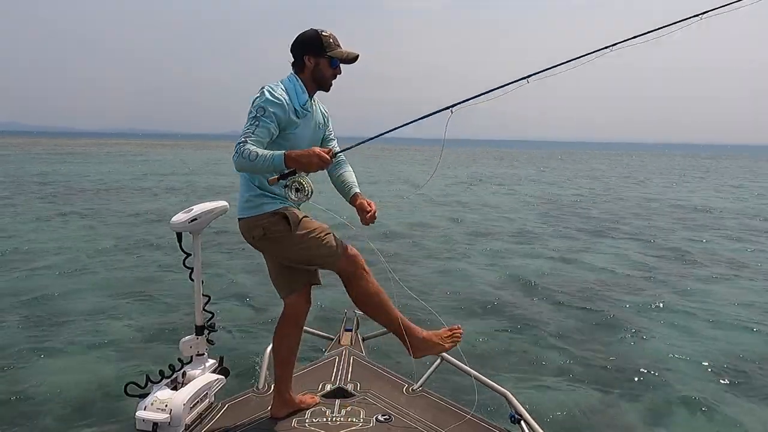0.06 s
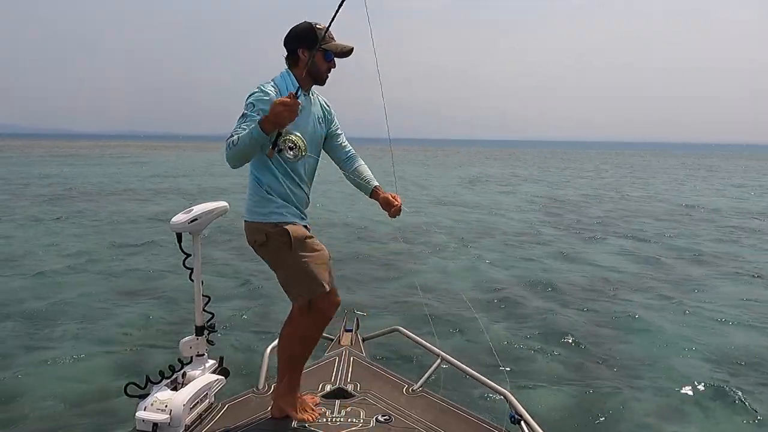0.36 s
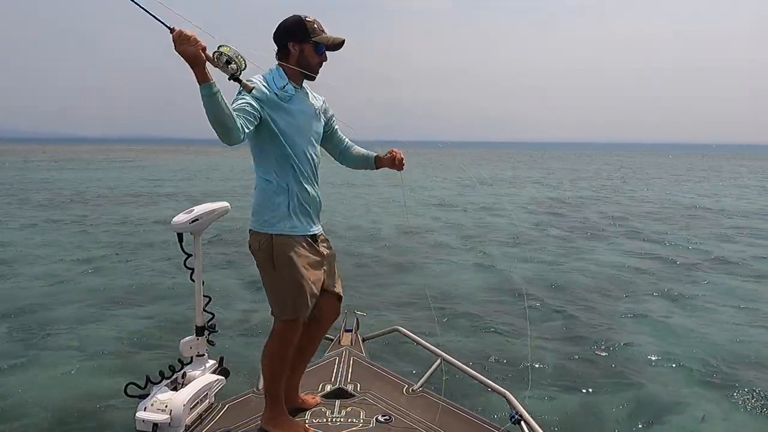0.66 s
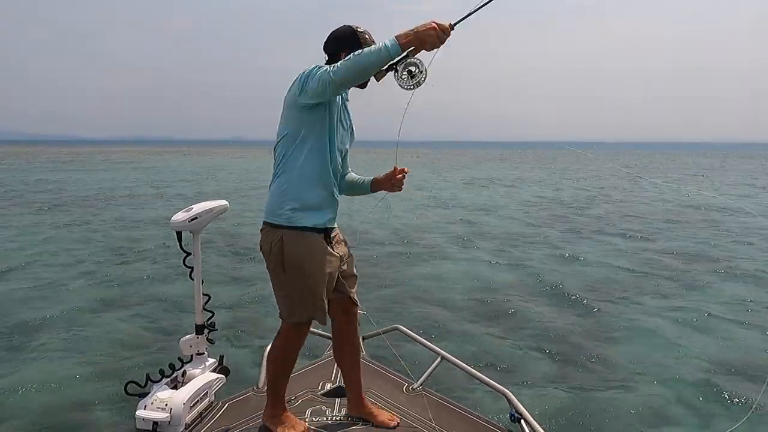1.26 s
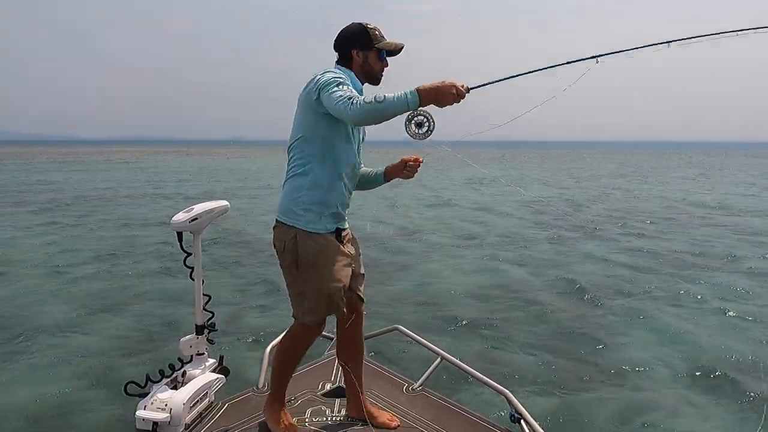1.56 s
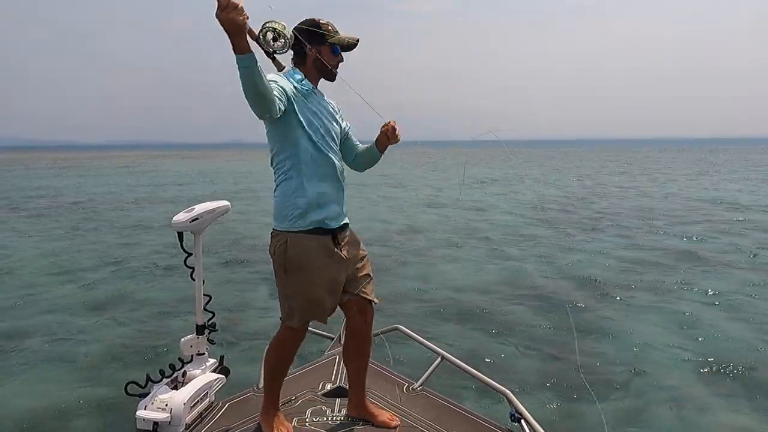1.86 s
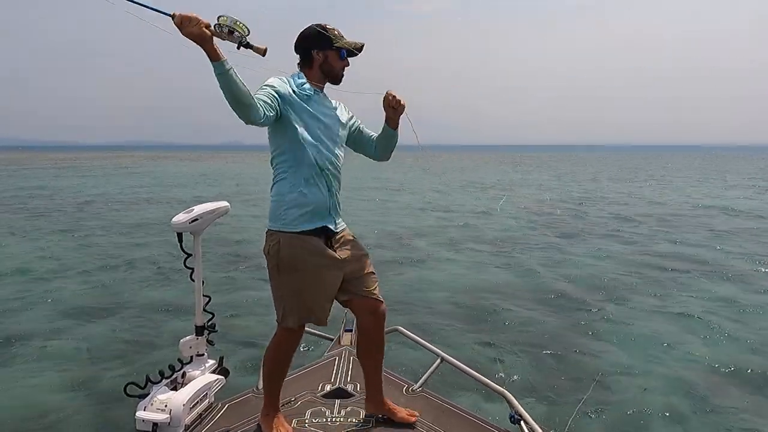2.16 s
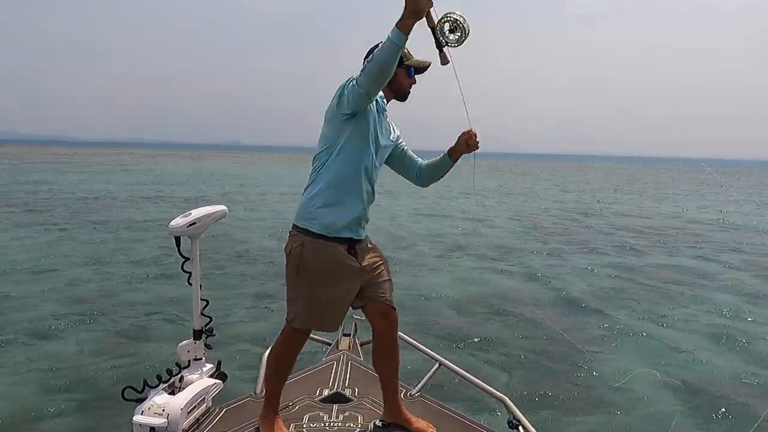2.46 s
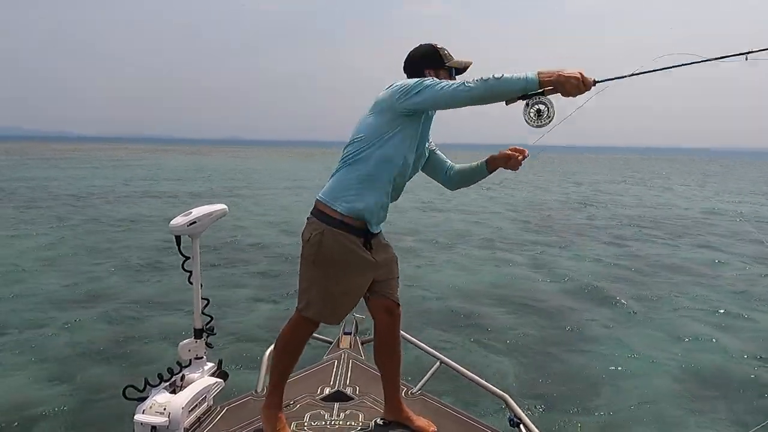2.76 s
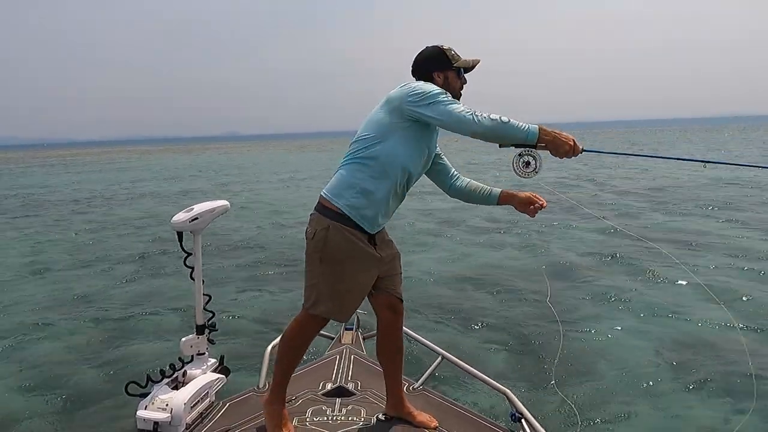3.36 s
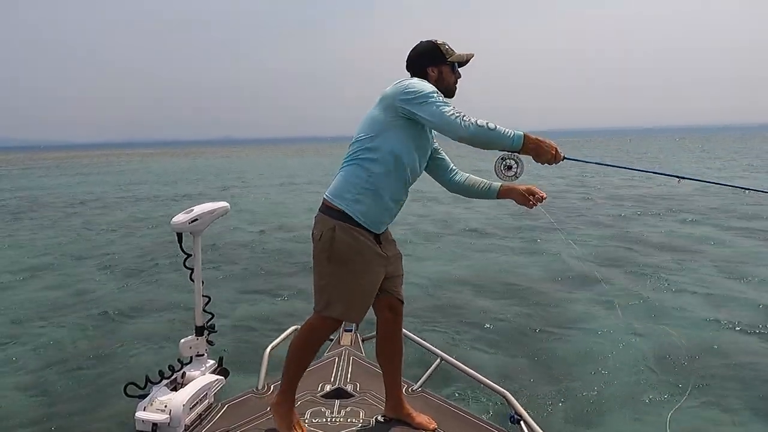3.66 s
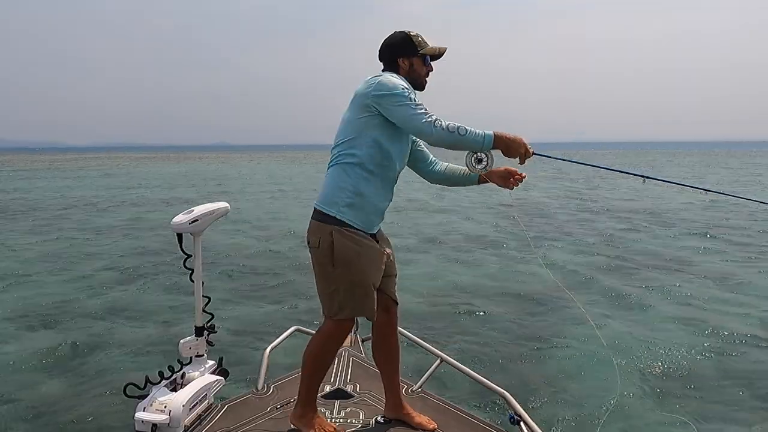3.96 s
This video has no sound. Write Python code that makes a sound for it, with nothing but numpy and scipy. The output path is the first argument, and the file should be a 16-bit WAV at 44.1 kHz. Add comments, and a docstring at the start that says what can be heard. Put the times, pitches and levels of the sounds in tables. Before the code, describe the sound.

A fly rod swishes and its line whistles at about 0.7 seconds, over steady wind rumble on the microphone and a faint sea wash. The line hisses and ticks through the rings around 1.3 seconds, then a hard gust thumps at 1.6. A second swish comes at 2 seconds, with soft line hiss near 2.8. Dull wind knocks crowd the last half second, with one dry tick among them.

```python
"""Fly casting from the bow of a boat on open water. From the start, wind rumbles on the microphone and
hits it in short low knocks, over a faint wash of sea. At 0.7 s comes a back cast: the rod swishes and the
line whistles after it. On the forward cast, at 1.3 s, the line hisses and ticks through the rod rings,
and a hard buffet follows. A second back cast swishes at 2 s, the line hisses forward again near 2.8 s,
and the wind knocks crowd together in the last half second, with one short, dry tick among them."""
import sys
import numpy as np
from scipy import signal
from scipy.fft import rfft, irfft, next_fast_len
from scipy.io import wavfile
from scipy.ndimage import uniform_filter1d, minimum_filter1d, map_coordinates

SR = 44100
rng = np.random.default_rng(int(sys.argv[2]) if len(sys.argv) > 2 else 0)


def wrap_up_sound(samples):
    """Save the sound to the file named by the first command line argument, as 16-bit audio."""
    columns = np.atleast_2d(samples).T
    # keep every value between -1 and 1, then stretch to whole-number steps
    tamed = np.clip(columns, -1, 1)
    steps = np.round(tamed * 32767).astype(np.int16)
    wavfile.write(sys.argv[1], SR, steps)


N = 176400  # 4 s


def amp(db):
    """Decibels to gain."""
    return 10 ** (np.asarray(db) / 20)


def unit(x):
    """Scale to rms 1."""
    return x / np.sqrt(np.mean(x ** 2) + 1e-20)


def eq(points):
    """An EQ curve: gain as a function of frequency, through dB points on a log axis."""
    freqs, db = np.transpose(points)
    return lambda freq: amp(np.interp(np.log(freq + 1e-6), np.log(freqs), db))


def faders(rows):
    """One value per sample for each column after the time."""
    times, *columns = np.transpose(rows)
    return [np.interp(np.arange(N) / SR, times, column) for column in columns]


def wobble(rate_hz):
    """A smooth random curve with rate_hz knots a second."""
    return map_coordinates(rng.standard_normal(4096), [np.arange(N) * rate_hz / SR], mode="wrap")


def filtered(x, response):
    """Shape x by a gain that depends on frequency."""
    size = next_fast_len(N + 8192)
    return irfft(rfft(x, size) * response(np.fft.rfftfreq(size, 1 / SR)), size)[:N]


def noise(spectrum):
    """Coloured noise of rms 1."""
    return unit(filtered(rng.standard_normal(N), eq(spectrum)))


def steadied(x, samples):
    """Even out the chance swells of a noise."""
    return x / np.sqrt(np.abs(uniform_filter1d(x ** 2, samples)) + 1e-9)


def swell(at, rise, fall, shape):
    """An envelope that peaks at a given time: shape 1 is a spike, 2 a bell, 3 flatter on top."""
    t = np.arange(N) / SR - at
    return np.exp(-.5 * np.abs(t / np.where(t < 0, rise, fall)) ** shape)


def gliding_noise(at, pitch_hz, glide, colour, patch_db):
    """Noise whose colour rides on a gliding pitch, with brief chance tones patch_db deep."""
    hz, t, spectra = signal.stft(rng.standard_normal(N), SR, nperseg=512)
    pitch = pitch_hz * 2 ** (glide * np.clip(t - at, -.12, .12))
    patches = uniform_filter1d(rng.standard_normal(spectra.shape), size=3, axis=0)
    patches = unit(uniform_filter1d(patches, size=5, axis=1))
    gain = colour((hz[:, None] + 1) / pitch) * amp(patch_db * patches)
    gain /= np.sqrt(np.mean(gain ** 2, axis=0) + 1e-12)
    return signal.istft(spectra * gain, SR, nperseg=512)[1][:N]


# Wind fader rides, ahead of trim and cap (time [s], rumble level [dB], flutter level [dB])
WIND_RIDES = [(0.0, -16.5, -29), (0.24, -29, -58), (0.29, -20, -35), (0.32, -21, -43.5), (0.48, -20, -29.5),
              (0.65, -21, -38.5), (1.08, -19.5, -29.5), (1.38, -19.5, -32.5), (1.5, -18, -22.5),
              (1.58, -13, -47), (1.6, -32, -33), (1.73, -24.5, -36.5), (1.88, -19.5, -30),
              (1.97, -20.5, -29.5), (2.07, -21, -35.5), (2.13, -18.5, -28.5), (2.24, -20, -38),
              (2.3, -16, -28.5), (2.32, -23, -35.5), (2.51, -18, -16), (2.53, -23.5, -36.5),
              (2.62, -17.5, -28), (2.73, -20.5, -38.5), (2.84, -18.5, -26), (2.96, -22, -36.5),
              (2.99, -17, -24), (3.12, -23.5, -36.5), (3.27, -19, -28.5), (3.43, -23, -37.5),
              (3.48, -19, -35), (3.6, -20.5, -28), (3.62, -17.5, -26.5), (3.98, -20, -37),
              (4.0, -20.5, -55)]
# Lulls between buffets; a negative depth is a lift (time [s], depth [dB], half length [s])
WIND_LULLS = [(0.0,0,0.029),(0.522,1,0.025),(0.613,6.5,.018),(0.875,1,0.032),(1.286,8,0.0072),(1.364,8.5,0.02),(1.654,12,0.0058),(1.719,4,0.013),(2.054,11.5,0.013),(2.22,5.5,0.01),(2.712,2.5,.012),(3.19,1,0.012),(3.41,-4.5,0.011),(3.932,0,0.0086)]
# Sub-heavy body of the wind (frequency [Hz], level [dB])
RUMBLE_EQ = [(15,-3),(28,0),(58,0.5),(85,-3),(120,-2.5),(160,-10),(240,-15),(400,-27),(800,-66),(2000,-120)]
# Its low-mid flutter (frequency [Hz], level [dB])
FLUTTER_EQ = [(60,-40.5),(170,-3),(300,4.5),(420,-4.5),(600,-12),(850,-23.5),(1300,-37.5),(2500,-83),(6000,-88)]


def wind(rumble_trim_db=1.54, flutter_trim_db=-0.5, flutter_cap_db=-28):
    """Wind on the microphone: a deep rumble that drops between buffets, under a quick, lumpy flutter."""
    rumble_db, flutter_db = faders(WIND_RIDES)
    lull_db = sum(db * swell(at, half, half, shape=2.6) for at, db, half in WIND_LULLS)
    rumble = amp(rumble_db - lull_db + rumble_trim_db) * steadied(noise(RUMBLE_EQ), samples=1400)
    flutter = unit(steadied(noise(FLUTTER_EQ), samples=1000) * amp(2.5 * wobble(110)))
    return rumble + amp(np.minimum(flutter_db, flutter_cap_db) + flutter_trim_db) * flutter


# Fader ride of the sea wash (time [s], level [dB])
WASH_RIDE = [(0,-54.5),(.25,-52),(.5,-49.5),(.9,-50.5),(1.1,-46),(1.35,-48),(1.6,-53.5),(1.9,-49),(2.25,-55.5),(2.7,-55),(2.95,-58),(3.05,-48),(3.2,-58),(3.32,-53.5),(3.6,-55.5),(4,-53.5)]
# Soft midrange of the wash (frequency [Hz], level [dB])
WASH_EQ = [(200,-6.5),(700,12.5),(1300,6),(2500,0.5),(4000,-6.5),(5500,-14),(7500,-23.5),(9800,-35),(11000,-43),(14000,-52.5)]
# Fader ride of the water's fizz (time [s], level [dB])
FIZZ_RIDE = [(0,-73),(.15,-69.5),(.25,-65),(.6,-66.5),(1,-67.5),(1.19,-82),(1.3,-58),(1.58,-69.5),(1.66,-67.5),(2.2,-71.5),(2.58,-71),(3,-70.5),(3.44,-65),(3.6,-66),(3.8,-77),(4,-68.5)]
# Thin, bright tone of the fizz (frequency [Hz], level [dB])
FIZZ_EQ = [(2000,-15.5),(4000,4),(5500,-1),(7500,-8),(9800,-15.5),(11000,-23.5),(13000,-37)]


def sea():
    """Small waves lay down a faint bed of wash, with a high fizz on top."""
    wash = amp(faders(WASH_RIDE)[0] + 2.06 * wobble(35.06)) * noise(WASH_EQ)
    fizz = amp(faders(FIZZ_RIDE)[0] + 1.3 * wobble(45)) * noise(FIZZ_EQ)
    return wash + fizz


# Wind hits on the microphone (time [s], level [dB], half length [s], low-pass corner [Hz])
KNOCK_CUES = [(0.049,-26.5,0.0037,490),(0.079,-25.5,0.0037,397),(0.391,-25,0.0028,340),(0.426,-32,.005,560),(0.47,-24.5,0.0055,547),(0.565,-26,0.008,440),(0.782,-27,0.01,336),(1.09,-26,0.0033,560),(1.124,-29,0.0056,540),
              (1.517,-14.5,0.0018,616),(1.528,-16.5,0.0026,520),(1.55,-16,0.003,476),(1.553,-16,0.0072,192),(1.561,-20,0.0015,720),(1.5678,-18,0.0015,1300),(1.568,-38,0.00077,2700),(1.571,-18,0.0036,725),(1.5776,-11.5,0.0025,565),(1.817,-27.5,0.0062,470),
              (2.298,-17,0.0018,516),(2.343,-26.5,0.0045,644),(2.486,-21.5,0.0019,513),(2.501,-23,0.0039,473),(2.666,-23.5,0.0038,610),(2.682,-25,0.0056,470),(2.841,-23,0.0029,425),
              (2.99,-16,0.0037,556),(3.012,-21.5,0.0067,390),(3.052,-26,0.0048,530),(3.293,-25,0.0093,387),(3.477,-16.5,0.0047,480),(3.494,-23.5,0.0019,565),
              (3.527,-19,0.0045,570),(3.546,-21.5,0.0064,430),(3.6182,-22.5,0.0021,586),(3.627,-21.5,0.0018,520),(3.661,-19.5,0.0053,380),(3.664,-15.5,0.0032,684),(3.698,-23,0.0038,900),
              (3.739,-19.5,0.0075,570),(3.737,-27.5,0.0012,1900),(3.7413,-30,0.00068,2270),(3.788,-25,0.0059,580),(3.8032,-17,0.00087,810),(3.812,-22,0.0029,710),(3.835,-20.5,0.0031,580),(3.878,-23,0.0053,480),(3.899,-17.5,0.0034,524),(3.949,-23,0.0034,520),(3.968,-25,.005,507)]


def wind_knocks(low_cut_hz=106, rolloff_order=4.33):
    """Single eddies hit the microphone, each a short, dull puff of noise."""
    out = np.zeros(N)
    for at, db, half, corner_hz in KNOCK_CUES:
        band = lambda hz: hz / np.hypot(hz, low_cut_hz) / np.hypot(1, (hz / corner_hz) ** rolloff_order)
        envelope = swell(at, half, half, shape=1.9)
        puff = steadied(filtered(rng.standard_normal(N), band), samples=600) * envelope
        out += amp(db) * puff * np.linalg.norm(envelope) / np.linalg.norm(puff)
    return out


# Rod strokes (time of top speed [s], level [dB], rise [s], fall [s], pitch [Hz], glide [octaves/s])
SWISH_CUES = [(0.697,-36.5,0.087,0.052,2005,2.4),(1.32,-51,0.032,0.031,2650,2),(1.995,-35.5,0.066,0.035,2220,2.3)]
# Broad body of a swish (frequency [multiple of the pitch], level [dB])
SWISH_EQ = [(.15,-35.5),(.4,-7.5),(.58,2),(1.05,1),(1.5,-2),(2.3,-7.5),(3.2,-17),(4.5,-30.5),(6,-47),(9,-72.5)]


def rod_swishes():
    """The tapered rod sheds eddies over a range of pitches, swelling and climbing as it sweeps past."""
    out = np.zeros(N)
    for at, db, rise, fall, hz, glide in SWISH_CUES:
        eddies = gliding_noise(at, hz, glide, eq(SWISH_EQ), patch_db=2.5)
        out += amp(db) * swell(at, rise, fall, shape=1.98) * eddies
    return out


# Line whistles, plus one short, dry tick among the late wind knocks
# (time [s], level [dB], half length [s], pitch [Hz], glide [octaves/s], width [octaves])
WHISTLE_AND_TICK_CUES = [(0.557,-47.5,.007,3420,0,0.045),(0.703,-51.5,.04,5100,1,0.29),(0.624,-41,0.027,1200,9,0.18),(0.684,-40.5,0.025,1900,-0.5,0.052),(0.703,-43.5,0.038,1480,2,0.089),(0.729,-42,0.016,2530,-4,0.068),(0.803,-53,0.028,1740,-3,0.06),(1.472,-66.5,0.035,8800,1,.09),(1.552,-65,.012,8450,-10,0.08),
                         (1.712,-57,0.01,3270,-10,.18),(1.915,-36.5,0.02,770,-8,0.27),(1.949,-34,0.025,846,8.5,0.31),(2.003,-34,0.016,2600,0.5,0.08),(1.98,-39.5,.024,1830,5,.12),(1.977,-41.5,.014,3930,8,0.24),(2.011,-43,.024,5030,2,0.22),
                         (2.089,-43.5,0.018,2080,7,0.1),(2.119,-43,0.029,2600,3.5,0.11),(2.167,-53.5,0.019,2670,-5,0.17),(2.207,-59,.024,3160,3,0.07),
                         (2.515,-67.5,0.069,5870,-4.5,0.14),(2.684,-69,0.057,2300,-17,0.11),(2.69,-65,.02,5600,14,.12),(2.843,-53,0.021,5700,4,0.32),(2.908,-60,.018,6700,10,.07),(2.935,-63,.025,8200,2,0.16),(3.3,-70.5,0.033,6500,-1,.08),(3.406,-74,.05,6200,0,.12),(3.643,-53.5,0.0086,3200,0,.35)]


def whistles_and_late_tick():
    """Flying line cuts the air and sings narrow, gliding tones; a separate dry tick sounds at 3.64 s."""
    tones = np.zeros(N)
    for at, db, half, hz, glide, width in WHISTLE_AND_TICK_CUES:
        peak = lambda ratio: 1 / (1 + (np.log2(ratio) / width) ** 2) ** 1.4
        tone = gliding_noise(at, hz, glide, peak, patch_db=3.5)
        tones += amp(db) * swell(at, half, half, shape=2.9) * tone
    return tones * amp(1.7 * wobble(80))


# Runs of line (time of top speed [s], level [dB], rise [s], fall [s], pitch [Hz], glide [octaves/s])
HISS_CUES = [(.8,-56,0.027,0.061,6470,-4),(.88,-61.5,0.034,0.046,8200,-2.5),(1.275,-53,0.014,0.014,7540,-2),(1.335,-74,0.01,.02,6800,-3),(1.39,-54.5,0.012,0.032,6700,-2),(1.521,-65.5,0.088,0.18,8500,-2.5),(1.76,-66.5,0.07,0.25,8350,-2),(2.069,-55,0.069,0.075,6430,-1.5),
             (2.3,-68,0.084,0.19,7540,-1),(2.725,-62.5,0.035,0.048,7140,9.5),(2.835,-54,0.019,0.044,8200,0.5),(2.92,-56,0.05,0.041,7870,-1),(3.09,-66.5,.06,0.083,6800,0.5),(3.35,-75,0.11,0.15,6320,-6.5)]
# Taps of line on the rings (time [s], level [dB], fall [s], pitch [Hz])
TICK_CUES = [(0.773,-51,0.003,9300),(0.787,-52,0.0017,6800),(1.116,-55.5,0.0018,6440),(1.252,-56.5,0.0035,7500),(1.283,-47,.0022,7200),(1.291,-51,.002,6000),(1.307,-51,0.002,7800),(1.326,-45.5,0.002,7200),(1.343,-47.5,0.002,7000),(1.375,-52,.002,7400),(1.386,-53,0.0018,7000),
             (2.066,-45.5,0.0016,6000),(2.347,-56.5,0.0027,4200),(2.634,-62.5,0.0028,7540),(3.124,-56,0.0028,5300),(3.533,-58,0.0035,6200)]
# Rasp shared by hiss and ticks (frequency [multiple of the pitch], level [dB])
RASP_EQ = [(.12,-27.5),(.3,-3),(.5,-3),(.68,-4.5),(.85,2),(1,0),(1.25,-2),(1.6,-10),(2.2,-20.5)]
# Top-end roll-off over both, after their cue levels (frequency [Hz], gain [dB])
RING_BUS_EQ = [(7000,1.5),(9600,-2.5),(10200,-6.5),(10900,-11),(12400,-11),(14000,-20.5)]


def line_through_rings(tick_rise_s=.0018):
    """The line rasps unevenly through the rod rings and ticks dryly against them."""
    hiss, ticks = np.zeros((2, N))
    for at, db, rise, fall, hz, glide in HISS_CUES:
        rasp = gliding_noise(at, hz, glide, eq(RASP_EQ), patch_db=2.0)
        hiss += amp(db) * swell(at, rise, fall, shape=1.1) * rasp
    for at, db, fall, hz in TICK_CUES:
        rasp = gliding_noise(at, hz, 0, eq(RASP_EQ), patch_db=3.5)
        ticks += amp(db) * swell(at, tick_rise_s, fall, shape=1.3) * rasp
    return filtered(hiss * amp(1.8 * wobble(170)) + ticks, eq(RING_BUS_EQ))


def scene():
    """Everything meets at one microphone in the open air."""
    bed = wind() + sea() + wind_knocks()
    return (bed + rod_swishes() + whistles_and_late_tick() + line_through_rings())[None]


def record(dry, ceiling=0.56, high_cut_hz=14100):
    """A limiter ducks the highest peaks, then a brick-wall filter takes off the top."""
    needed_gain = np.minimum(1, ceiling / (np.abs(dry[0]) + 1e-9))
    held_gain = minimum_filter1d(needed_gain, size=400)
    smooth_gain = uniform_filter1d(uniform_filter1d(held_gain, size=200), size=200)
    return filtered(dry[0] * smooth_gain, lambda hz: hz < high_cut_hz)[None]


dry = scene()
out = record(dry)
wrap_up_sound(out)
```